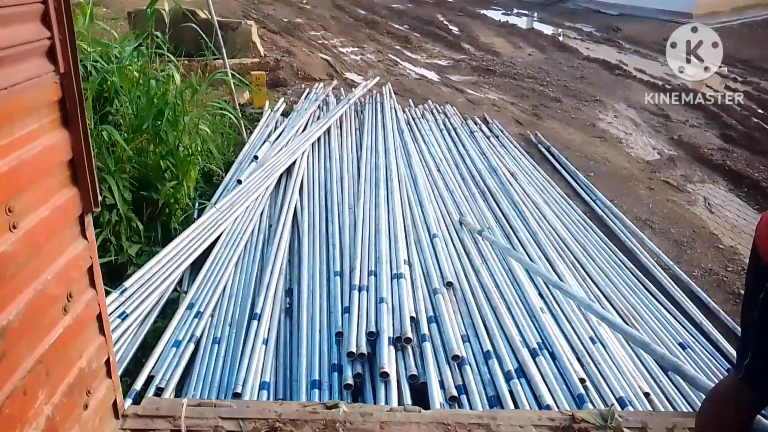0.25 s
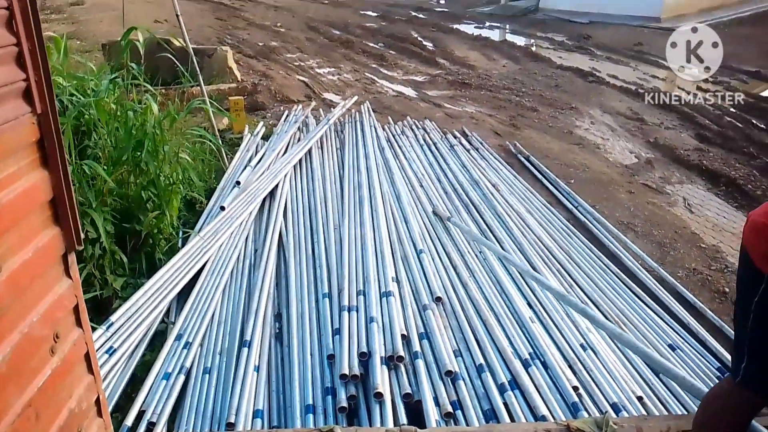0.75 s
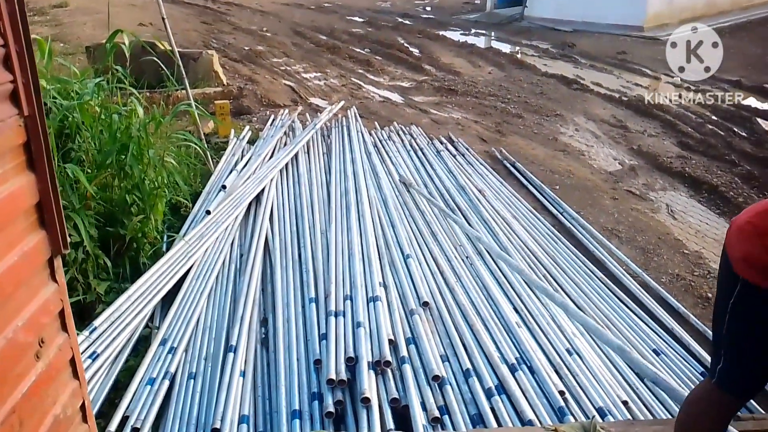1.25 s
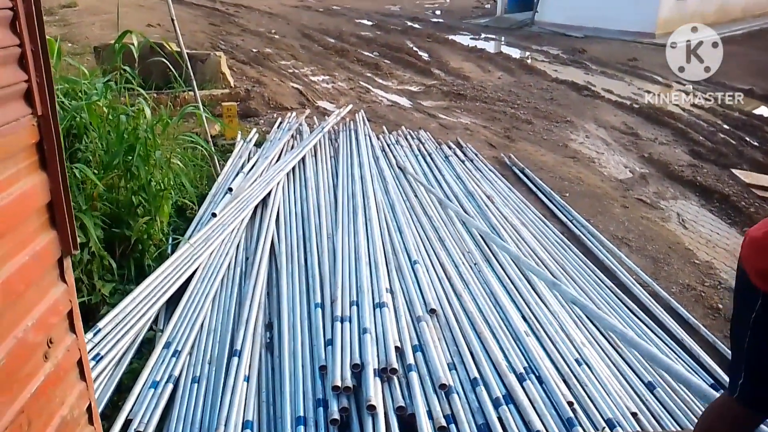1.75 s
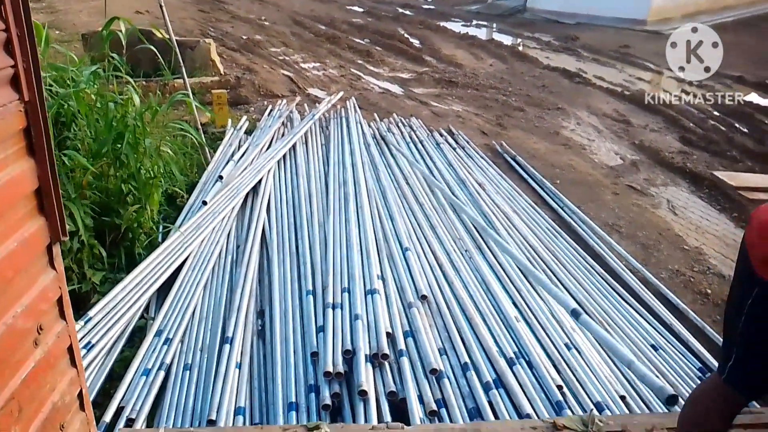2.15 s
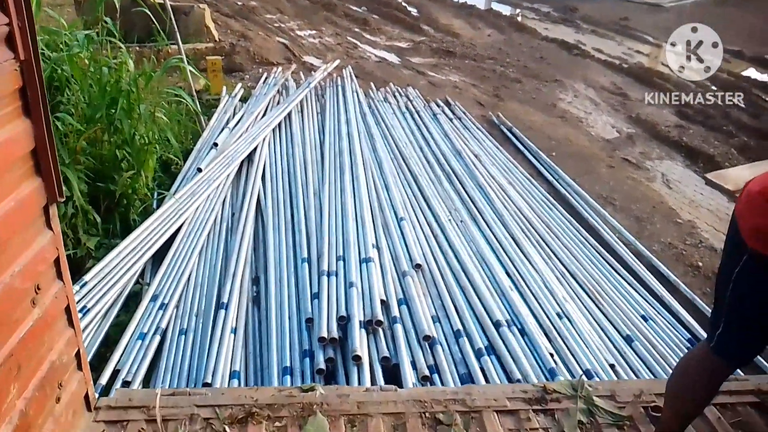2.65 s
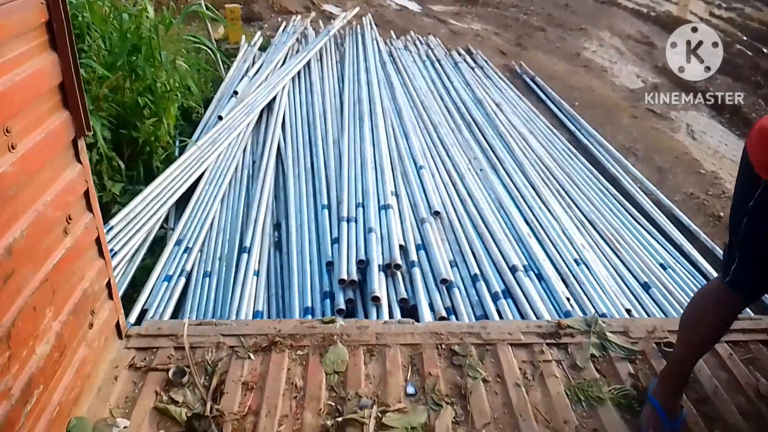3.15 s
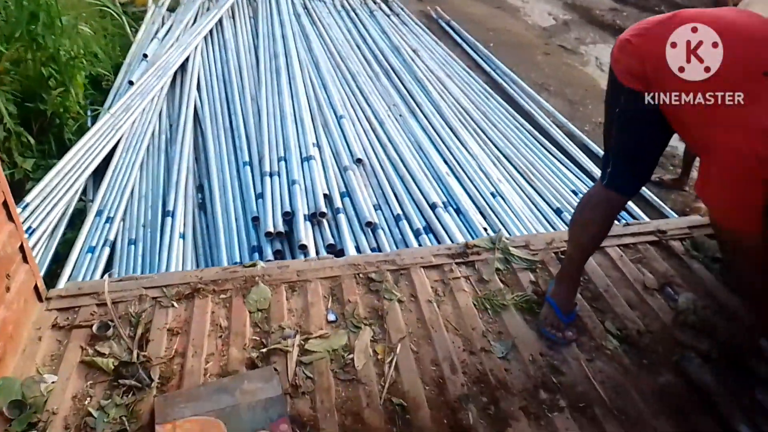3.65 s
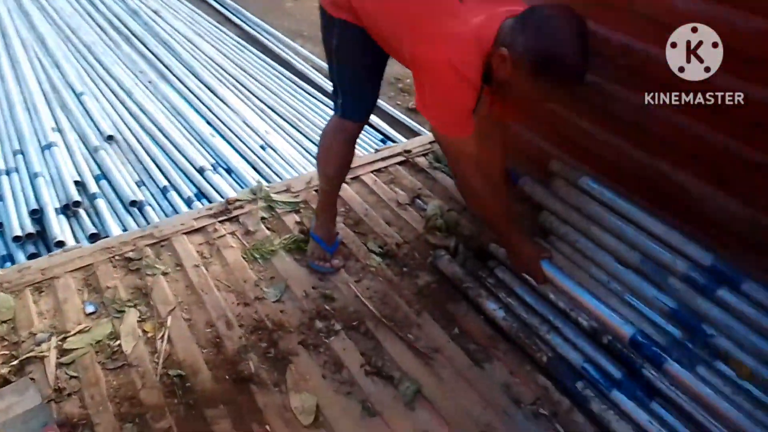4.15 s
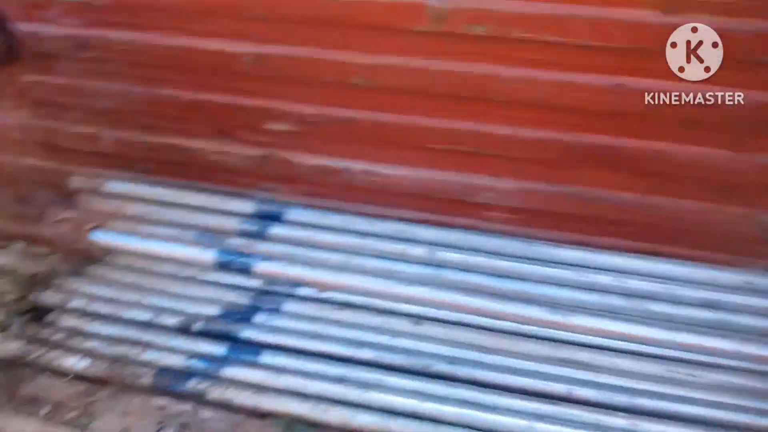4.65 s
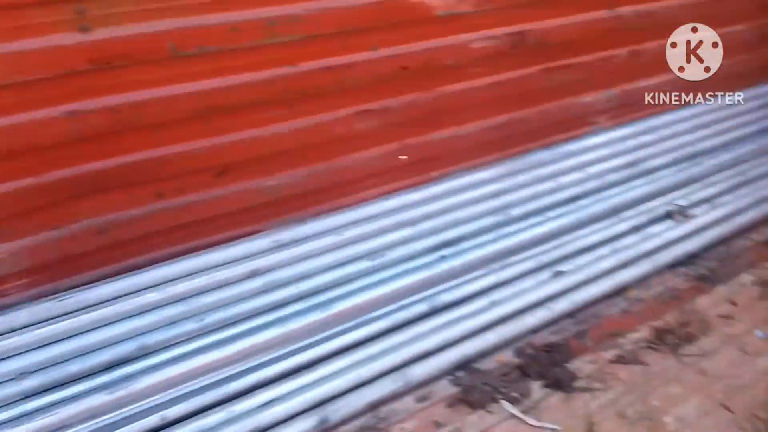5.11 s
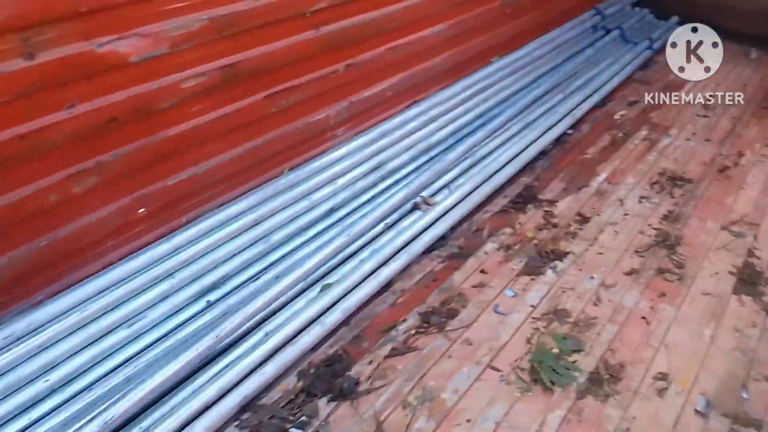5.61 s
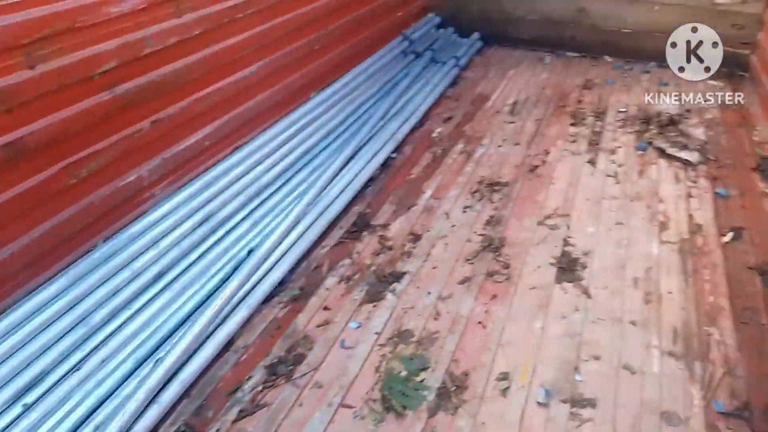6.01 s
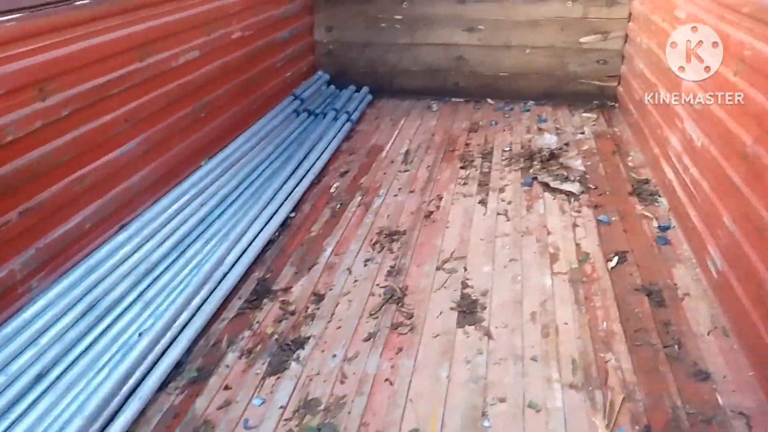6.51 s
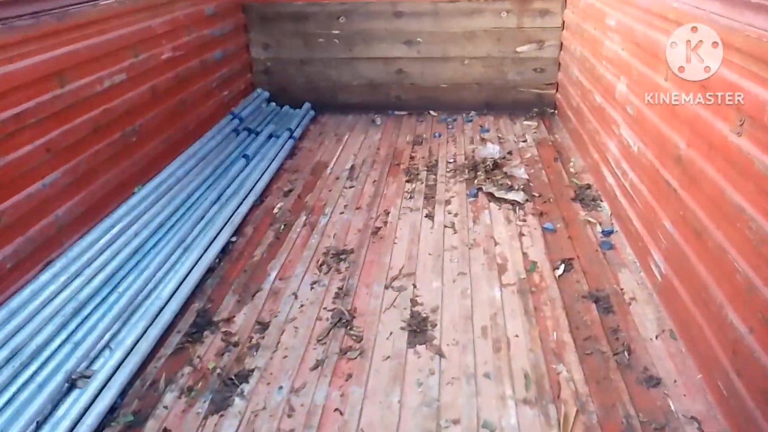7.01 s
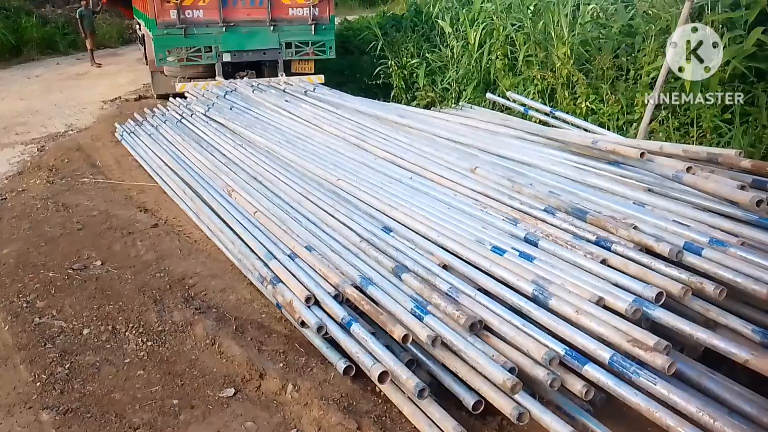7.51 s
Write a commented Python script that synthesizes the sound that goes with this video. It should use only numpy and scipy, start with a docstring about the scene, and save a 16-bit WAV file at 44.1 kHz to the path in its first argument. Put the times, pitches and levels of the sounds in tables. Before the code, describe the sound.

Loud clanging and zinging metal pipes with booming truck-bed rumble, a quieter middle, renewed clanks, then sudden hush and soft insect shimmer.

```python
"""Outdoors beside a truck: long steel pipes are pushed off its bed onto a pile; each one knocks, bounces and slides.
Contacts excite sine banks for the pipes' bending modes and the falling zing of their walls,
and decaying coloured noise for the bright rasp and the boom of the bed. Thuds, dry taps and a chassis rumble join in.
The clatter is cut off abruptly, and a quiet roadside of soft air and insects, both shaped noise, fades in."""
import sys
import numpy as np
from scipy import signal
from scipy.fft import rfft, irfft
from scipy.io import wavfile
from scipy.ndimage import uniform_filter1d, minimum_filter1d

SR = 44100
rng = np.random.default_rng(int(sys.argv[2]) if len(sys.argv) > 2 else 0)


def log_audio(samples):
    """Write samples as a 16-bit WAV file to the path given in sys.argv[1]."""
    # one column per channel
    frames = np.atleast_2d(samples).T
    # limit to full scale, then quantise
    limited = np.clip(frames, -1, 1)
    pcm = np.round(limited * 32767).astype(np.int16)
    wavfile.write(sys.argv[1], SR, pcm)


N = 342643
TIME = np.arange(N) / SR
RING_TIME = TIME[:int(0.7 * SR)]   # time axis of one struck sound
CUT_S, FADE_IN_S = 7.255, (7.35, 7.465)   # end of the clatter; start and end of the roadside's fade


def from_db(db):
    """Decibels to gain."""
    return 10 ** (np.asarray(db) / 20)


def unit(x):
    """Scale to energy 1."""
    return x / np.sqrt(np.sum(x ** 2) + 1e-20)


def add(track, s, sound):
    """Mix a sound in from time s."""
    start = max(round(s * SR), 0)
    track[start:start + len(sound)] += sound[:N - start]


def gain_at(colour, hz):
    """Read a colour on a log-frequency axis."""
    points = np.array(colour)
    return from_db(np.interp(np.log(hz + 1e-3), np.log(points[:, 0]), points[:, 1]))


def noise(colour, size):
    """Coloured noise of rms 1, falling away beyond the ends of its colour."""
    hz = np.linspace(1, SR / 2, size // 2 + 1)
    low_end = np.minimum(hz / colour[0][0], 1) ** 2
    high_end = np.minimum(colour[-1][0] / hz, 1) ** 2
    spectrum = rfft(rng.standard_normal(size)) * gain_at(colour, hz) * low_end * high_end
    return unit(irfft(spectrum, size)) * np.sqrt(size)


def attack(contact_s):
    """Force builds up smoothly while a contact lasts."""
    return np.sin(np.pi / 2 * np.minimum(RING_TIME / contact_s, 1)) ** 2


def dying(colour, t60, contact_s=0.00049):
    """Countless overlapping modes: coloured noise that dies away, energy 1."""
    decay = from_db(-60 * RING_TIME / t60)
    return unit(noise(colour, len(RING_TIME)) * decay * attack(contact_s))


def ring(hz, gain, t60, contact_s=0.0004):
    """A sum of decaying sines, energy 1."""
    t = RING_TIME.astype(np.float32)
    sines = np.sin(np.outer(np.float32(2 * np.pi * hz), t))
    decays = np.exp(np.outer(np.float32(-np.log(1000) / t60), t))
    return unit((np.float32(gain) @ (sines * decays)) * attack(contact_s))


def resonate(x, hz, width_hz):
    """One two-pole resonance with gain 1 on top."""
    r = np.exp(-np.pi * width_hz / SR)
    feedback = [1, -2 * r * np.cos(2 * np.pi * hz / SR), r * r]
    return signal.lfilter(np.array([1, 0, -1]) * (1 - r * r) / 2, feedback, x)


# Colour of the open air. Each row: frequency in Hz, relative density in dB per Hz.
AIR_COLOUR = [(24, -33.5), (40, 0.5), (140, -3.5), (217, -6.5), (363, -9), (968, -19.5), (2120, -17),
              (3220, -22.5), (4110, -18.5), (4880, -25.5), (5940, -36), (9010, -31.5), (14000, -48.5)]


def air():
    """Soft outdoor air is low-heavy noise, with a faint white hiss on top."""
    return from_db(-56.5) * noise(AIR_COLOUR, N) + from_db(-74) * rng.standard_normal(N)


# Bending modes of a long pipe, spreading apart as they climb.
# Each row: nominal frequency in Hz, typical level in relative dB.
PIPE_MODES = [(262, 1), (330, 5.5), (404, 6), (515, 5.5), (640, 0.5), (761, 3.5), (860, 1.5), (1030, 0),
              (1160, -5.5), (1272, -5), (1400, -4.5), (1535, -3.5), (1662, 0.5), (1784, 1.5), (1959, 1.5),
              (2100, -0.5), (2245, -1.5), (2397, -1.5), (2563, -11), (2715, -9.5), (2874, -7), (3050, -5),
              (3232, -12.5)]


def struck_modes(detune=0.0063, spread_db=5.0):
    """Each pipe is tuned a little differently, and each contact point favours other modes: (Hz, signed gain)."""
    hz, level_db = np.transpose(PIPE_MODES)
    signs = rng.choice([-1, 1], len(hz))
    gain = from_db(level_db + spread_db * rng.standard_normal(len(hz))) * signs
    return hz * (1 + detune * rng.standard_normal()), gain


# Colour of the pile ringing along. Each row: frequency in Hz, relative density in dB per Hz.
CLANG_COLOUR = [(120, -26.5), (230, -5.5), (330, 9.5), (480, 6), (650, 0), (1000, -1.5), (1700, -5),
                (2200, -2.5), (2700, -11.5), (3400, -13.5), (5000, -20), (8000, -42.5)]


def clang(t60, pile_t60, pile_db):
    """A pipe rings, its high modes dying first; the pile around rings along."""
    hz, gain = struck_modes()
    pipe = ring(hz, gain, t60 * (1000 / hz) ** 0.25)
    return unit(pipe + from_db(pile_db) * dying(CLANG_COLOUR, pile_t60))


OVAL_HZ = 3590   # lowest cut-on at which a pipe wall flexes into an oval; each ring starts up to 42.3 Hz above


def zing(t60, lowest_db, spacing_hz=0.11, damping_hz=350, count=70):
    """Oval wall waves crowd above their cut-on; the lowest travel slowest and last longest, so the ring settles there."""
    k = np.arange(count) + 1
    above_hz = spacing_hz * k ** 2 * rng.uniform(0.7, 1.1)
    lowest = 1 + from_db(lowest_db) * np.exp(-above_hz / 60)
    # alternating signs carry the wave from the far end; dents and neighbours scatter part of it
    gain = ((-1.) ** k + rng.standard_normal(count)) * np.sqrt(k) * lowest
    hz = OVAL_HZ + rng.uniform(0, 42.3) + above_hz
    return ring(hz, gain, t60 / (1 + above_hz / damping_hz), contact_s=0.003)


# Colour of the rumbling bed panels. Each row: frequency in Hz, relative density in dB per Hz.
BOOM_COLOUR = [(50, -23.5), (85, -16.5), (110, -7), (135, -2), (160, -3), (210, -0.5), (300, -5),
               (400, -9.5), (520, -14), (800, -20.5), (2000, -60.5)]
# Hollow modes of the truck bed. Each row: nominal frequency in Hz, relative level in dB, t60 in seconds.
BED_MODES = [(136.2, -3, 0.74), (162.4, 1, 0.59), (182, 0, 0.52), (216.2, -2.5, 0.56), (287.3, -4, 0.25),
             (403, -4, 0.1)]


def boom(t60, modes_db):
    """The bed's panels rumble, with a few hollow modes among them."""
    hz, level_db, mode_t60 = np.transpose(BED_MODES)
    tuned_hz = hz * rng.normal(1, 0.018, len(hz))
    hollow = ring(tuned_hz, from_db(level_db) * rng.choice([-1, 1], len(hz)), mode_t60)
    return unit(dying(BOOM_COLOUR, t60, contact_s=0.0094) + from_db(modes_db) * hollow)


def contacts(per_s, spread_db):
    """Random small collisions of uneven strength, rms 1."""
    sizes = from_db(spread_db * np.clip(rng.standard_normal(N), -2, 2)) * rng.choice([-1, 1], N)
    return unit(sizes * (rng.random(N) < per_s / SR)) * np.sqrt(N)


def shaken(bodies, per_s, spread_db, even_s=0.2):
    """Several bodies, each under its own hail of contacts; their summed vibration is held near rms 1."""
    x = sum(signal.oaconvolve(contacts(per_s, spread_db), body)[:N] for body in bodies)
    power = np.abs(uniform_filter1d(x ** 2, int(even_s * SR) + 1))
    return x / np.sqrt(power + 1e-6)


def contact_tone(x, tone_hz, emphasis=1.15, octaves=0.99):
    """The stiffness of the contact favours a region that moves as the pipe slides."""
    favoured = 0
    for hz in np.geomspace(600, 2400, 5):
        nearness = np.exp(-(np.log2(tone_hz / hz) / octaves) ** 2)
        favoured = favoured + resonate(x, hz, hz / 2) * nearness
    return unit(x + emphasis * favoured) * np.sqrt(N)


SWELL_S, BED_SWELL_S = 0.0085, 0.054   # the steel answers at once, the heavy bed later
BED_LINGERS = 2   # the bed takes this many times longer to settle than the steel
# Spells of rattling and sliding. Each row: nominal start in seconds, hold in seconds, settling of the steel
# in dB per second, then relative clang, boom, rasp and zing levels in dB, contact tone in Hz.
SPELLS = [(0.0, 0.1, 78, -15, -11, -29.5, -23, 1400), (0.304, 0.14, 58.5, -19, -13.5, -38.5, -36, 1086),
          (0.554, 0.33, 60.5, -60, -39.5, -42.5, -47, 1000), (0.87, 0.15, 57, -58, -38.5, -39.5, -46, 1145),
          (1.03, 0.23, 48, -13.5, -14.5, -25, -24, 1100), (1.493, 0.16, 99.5, -18.5, -16.5, -38, -49, 964),
          (1.74, 0.25, 59, -52, -43, -46, -69, 800), (2.103, 0.11, 151, -13, -10, -29, -45, 950),
          (2.26, 0.058, 72, -19, -17.5, -29.5, -34, 1050), (2.47, 0.03, 83.5, -22.5, -27, -35, -40, 1050),
          (2.573, .27, 136.5, -16, -29.5, -23.5, -27, 1550),
          (3.068, 0.16, 96.5, -39.5, -31, -49, -52, 1070),
          (3.207, 0.027, 108.5, -27.5, -16.5, -36.5, -33.5, 1153),
          (3.56, 0.096, 33.5, -40.5, -28, -51, -59, 1117), (4.133, .44, 131, -48.5, -45, -57.5, -64, 1100),
          (4.542, 0.059, 168.5, -43, -27, -47, -44.5, 850), (4.925, .03, 152, -66, -48, -53.5, -65, 1490),
          (4.959, 0.045, 70, -30, -25, -44.5, -38, 1250), (5.286, 0.53, 120, -45, -36.5, -53.5, -51, 1403),
          (5.847, 0.12, 151, -49.5, -31, -52, -70, 806), (5.914, .16, 85.5, -11.5, -12, -31, -30, 1220),
          (6.15, 0.074, 64.5, -22.5, -15.5, -40.5, -36, 1000),
          (6.407, 0.19, 93, -37.5, -28, -43, -44, 1500), (6.568, 0.39, 87.5, -17, -16, -41, -47, 1300),
          (7.005, .17, 149.5, -16.5, -34, -30.5, -30.5, 850)]


def spell_curves():
    """Each spell swells, holds and settles at its own rate; overlapping spells add in power and blend their tones."""
    t = TIME[::40]
    start, hold, settling, clang_db, boom_db, rasp_db, zing_db, tone_hz = np.transpose(SPELLS)[:, :, None]
    # a blow within 20 ms sets the spell off
    blow_s = np.array(BLOWS)[:, 0]
    sets_off = np.abs(blow_s - start) < 0.02
    start = np.where(sets_off.any(axis=1), blow_s[sets_off.argmax(axis=1)], start[:, 0])[:, None]
    fall_db = settling * np.maximum(t - start - hold, 0)
    steel = np.clip((t - start) / SWELL_S, 0, 1) * from_db(-fall_db)
    bed = np.clip((t - start) / BED_SWELL_S, 0, 1) * from_db(-fall_db / BED_LINGERS)
    layers = [(clang_db, steel), (boom_db, bed), (rasp_db, steel), (zing_db, steel)]
    powers = [(from_db(db) * shape) ** 2 + 1e-18 for db, shape in layers]
    # the louder clang pulls the blended tone towards its own
    tone = np.sum(powers[0] * tone_hz, axis=0) / np.sum(powers[0], axis=0)
    levels_db = [10 * np.log10(np.sum(power, axis=0)) for power in powers]
    return [np.interp(TIME, t, curve) for curve in levels_db + [tone]]


# Colour of steel scraping steel. Each row: frequency in Hz, relative density in dB per Hz.
RASP_COLOUR = [(1200, 4), (2500, 0), (3300, -2.5), (4400, 2), (5500, -3.5), (7000, -5), (8500, -15),
               (9600, -24), (10200, -18), (11200, -27.5), (13000, -34.5), (15000, -27.5)]


def rattle(count=4):
    """Pipes chatter and slide on each other and on the bed: hails of small contacts follow the spells."""
    clang_db, boom_db, rasp_db, zing_db, tone_hz = spell_curves()
    pipe_bodies = [clang(t60=0.34, pile_t60=0.32, pile_db=2.5) for _ in range(2 * count)]
    pipes = shaken(pipe_bodies, per_s=11, spread_db=2.5)
    walls = shaken([zing(t60=1.0, lowest_db=3.5) for _ in range(count)], per_s=11, spread_db=2.5)
    bed = shaken([boom(t60=0.26, modes_db=-0.5) for _ in range(count)], per_s=30, spread_db=2)
    grit = shaken([dying(RASP_COLOUR, t60=0.17) for _ in range(count)], per_s=70, spread_db=1.0)
    return (from_db(clang_db - 3.0) * contact_tone(pipes, tone_hz)
            + from_db(zing_db - 2.5) * walls
            + from_db(boom_db - 5) * bed
            + from_db(rasp_db + 1) * grit)


def clank(tone_hz, t60=0.11, octaves=0.3, pile_db=-3, below=1.24, above=1.26):
    """A hard contact picks out the few modes near its tone, then damps them; the pile answers in the same range."""
    hz, gain = struck_modes()
    nearness = np.exp(-(np.log2(hz / tone_hz) / octaves) ** 2)
    own = ring(hz, gain * nearness, np.full(len(hz), t60))
    band = signal.butter(2, [tone_hz / below, tone_hz * above], "band", fs=SR, output="sos")
    pile = unit(signal.sosfilt(band, dying(CLANG_COLOUR, t60=0.34)))
    return unit(own + from_db(pile_db) * pile)


BLOW_RASP_DB, BLOW_ZING_DB, BLOW_CRACK_DB = 8, 5, 15   # relative to a blow's level; a choke weakens zing and crack
# Square blows of pipe on pipe. Each row: start in seconds, relative level in dB,
# choke from 0 (rings freely) to 1 (dead clank), relative boom of the bed in dB, clank tone in Hz.
BLOWS = [(0.003, -5, 0.06, -20, 1000), (0.094, -16, 0.17, -8, 1900), (0.323, -3.5, 0.51, 0, 1260),
         (0.745, -15, 0.35, -16, 1050), (1.033, -10, 0.17, -13, 1020), (1.18, -3.5, .05, -19.5, 1300),
         (1.48, -11.5, 0.21, -22.5, 1030), (1.537, -14, 0.064, -35, 1280), (1.637, -15, .05, -24, 1600),
         (2.103, -4.5, 0.1, -3.5, 1180), (2.163, -6.5, .05, -7, 910), (2.284, -8, 0.08, -14, 1070),
         (2.465, -20.5, 0.3, -23.5, 1150), (2.587, -10.5, 0.95, -25, 1620), (2.757, -9, 1, -22.5, 1380),
         (2.806, -4.5, 1, -18.5, 1570), (3.215, -18, 0.86, -11, 1350), (3.25, -27, .5, -27, 1140),
         (3.583, -29, 0.68, -32.5, 910), (3.641, -30, 0.61, -31, 1510), (3.776, -32, 0.51, -37, 1340),
         (4.035, -31.5, 0.44, -38, 1100), (4.575, -39, .9, -21, 805), (4.961, -18, 0.82, -21, 1330),
         (5.09, -31, .2, -37, 1030), (5.924, -4.5, 0.89, -14.5, 1290), (5.945, -9.5, 0.85, -17, 1160),
         (6.025, -18, 0.82, -21, 1180), (6.154, -20, 0.11, -0.5, 1250), (6.17, -17, 0.86, -11, 960),
         (6.229, -21, 0.88, -3.5, 1030), (6.58, -10, 0.75, -18, 1175), (6.674, -9.5, 0.85, -22.5, 1690),
         (6.742, -15, 0.98, -8, 1020), (6.784, -12, 0.71, -7.5, 1320), (6.839, -7, 1, -11, 1500),
         (6.87, -11, 1, -19.5, 950), (6.945, -12.5, 0.89, -23, 1680), (7.011, -7.5, 0.41, -14, 1300),
         (7.108, -8.5, 1, -20, 950), (7.165, -12, 1, -26, 860)]


def blows():
    """A pipe lands: left free it cracks, rings and zings; choked by its neighbours it mostly clanks."""
    out = np.zeros(N)
    for s, level_db, choke, boom_db, tone_hz in BLOWS:
        free = 1 - choke
        crack = dying(CLANG_COLOUR, t60=0.041)   # the first crack of steel on steel
        steel = (from_db(25.0) * np.sqrt(choke) * clank(tone_hz)
                 + from_db(26.5) * np.sqrt(free) * clang(t60=0.58, pile_t60=0.25, pile_db=3.0)
                 + from_db(BLOW_RASP_DB) * dying(RASP_COLOUR, t60=0.29, contact_s=0.0018)
                 + from_db(BLOW_ZING_DB) * free * zing(t60=0.62, lowest_db=10.5)
                 + from_db(BLOW_CRACK_DB) * free * crack)
        bed = boom(t60=0.32, modes_db=-12.5)
        add(out, s, from_db(level_db) * steel + from_db(boom_db + 19) * bed)
    return out


# Glancing contacts, where a pipe skids a short way along another.
# Each row: start in seconds, relative level in dB, clank tone in Hz.
SKIDS = [(0.003, -16, 1000), (0.094, -21, 1950), (0.745, -33, 1050), (1.18, -14, 1300), (2.281, -36, 1070),
         (2.586, -17, 1620), (3.181, -34, 1030), (4.017, -37.5, 1070), (4.057, -36.5, 1070),
         (4.372, -49.5, 1950), (4.508, -44.5, 2100), (4.561, -45.5, 900), (5.296, -39.5, 2050),
         (5.5, -36, 1900), (5.535, -37.5, 1495), (5.664, -36.5, 2250), (6.086, -38, 1200),
         (6.425, -42, 1650), (6.466, -30, 1950), (6.58, -17.5, 1200), (6.653, -24, 1700),
         (6.784, -29, 1320), (6.84, -29, 1540), (6.95, -25, 1700), (7.009, -28.5, 1350)]


def skids(grip_s=0.0074):
    """A glancing contact takes a moment to grip, then rasps and sets the wall zinging, with a clank in a few modes."""
    out = np.zeros(N)
    for s, level_db, tone_hz in SKIDS:
        steel = (from_db(30.5) * dying(RASP_COLOUR, t60=0.21)
                 + from_db(25) * zing(t60=0.62, lowest_db=-4.5)
                 + from_db(27) * clank(tone_hz, t60=0.2, pile_db=-8.5))
        add(out, s, from_db(level_db) * steel * attack(grip_s))
    return out


# The chassis: relative level, inertia, share of the low clatter's swing in dB.
SHUDDER_DB, SHUDDER_LAG_S, SHUDDER_FOLLOWS = -18.5, 0.17, 0.77
LURCH_S, LURCH_LENGTH_S, LURCH_DB = 0.5, 0.17, -27   # one heavier heave early on: peak time, decay each side, level
# Colour of the truck's body shuddering on its springs. Each row: frequency in Hz, relative density in dB per Hz.
BODY_COLOUR = [(25, -14), (40, -10), (55, 0), (69, -8.5), (86, 1.5), (110, -8.5), (160, -19.5)]


def shudder(load, below_hz=500):
    """The deep rumble of the chassis is fed by the low part of the clatter, lags it and outlasts it; once it heaves."""
    low_part = signal.sosfilt(signal.butter(2, below_hz, fs=SR, output="sos"), load)
    keep = np.exp(-1 / (SHUDDER_LAG_S * SR))
    stored = signal.lfilter([1 - keep], [1, -keep], low_part ** 2)
    fed = from_db(SHUDDER_DB + SHUDDER_FOLLOWS * 10 * np.log10(stored + 1e-12))
    lurch = from_db(LURCH_DB) * np.exp(-np.abs(TIME - LURCH_S) / LURCH_LENGTH_S)
    return (fed + lurch) * noise(BODY_COLOUR, N)


# Dull thuds of weight on the bed. Each row: start in seconds, relative level in dB, pitch in Hz.
THUDS = [(3.23, -15.5, 186.5), (3.598, -16.5, 177.3), (3.715, -18.5, 163.7), (4.562, -16, 203.7),
         (4.597, -21, 186.7), (4.977, -3.5, 170.5), (5.001, -7, 164.1), (5.305, -17.5, 176),
         (6.239, -9, 261.5)]


def thuds(t60=0.48, overtone=1.65, overtone_db=-12):
    """A floor panel drums at its lowest two modes."""
    out = np.zeros(N)
    for s, level_db, hz in THUDS:
        modes_hz = hz * np.array([1, overtone])
        panel = ring(modes_hz, from_db([0, overtone_db]), np.full(2, t60), contact_s=0.0028)
        add(out, s, from_db(level_db + 20) * panel)
    return out


# Light, dry taps. Each row: start in seconds, relative level in dB, tone in Hz.
TAPS = [(3.7729, -33, 1980), (3.9679, -41.5, 1990), (4.158, -47, 3540), (4.875, -52.5, 2130),
        (5.261, -34.5, 2150), (5.6256, -40.5, 3730), (5.744, -32, 2940), (6.6533, -9.5, 2120),
        (6.6754, -15, 1970), (6.9456, -22.5, 2390)]


def taps():
    """Well-damped touches: a dry click, then a brief ring close to one tone inside a short scuff."""
    out = np.zeros(N)
    for s, level_db, tone_hz in TAPS:
        scuff = unit(resonate(dying(RASP_COLOUR, t60=0.084), tone_hz, 900))
        ping = ring(tone_hz * rng.uniform(0.94, 1.0, 3), rng.choice([-1, 1], 3), np.full(3, 0.07))
        click = dying(RASP_COLOUR, t60=0.014)
        tap = from_db(23.5) * scuff + from_db(5) * ping + from_db(11.0) * click
        add(out, s, from_db(level_db) * tap)
    return out


TURN_S = (4.2, 5.7)   # the listening point swings from the pile into the truck's steel box


def steel_box(x, hollow_db=-4, hollow_hz=340, dip=0.51, dip_hz=2950):
    """Facing into the box, reflections between its walls swell the low middle and thin the upper middle."""
    facing = np.interp(TIME, TURN_S, [0, 1])
    hollow = from_db(hollow_db) * resonate(x, hollow_hz, 51)
    return x + facing * (hollow - dip * resonate(x, dip_hz, 1600))


# Colour of the insects. Each row: frequency in Hz, relative density in dB per Hz.
INSECT_COLOUR = [(3000, -47.5), (3600, -21), (4000, -1), (4300, -3), (4800, -20), (5600, -16), (5900, -6),
                 (6200, -16), (7800, -14), (8800, -42)]


def roadside():
    """Quiet air under a steady insect shimmer: noise gathered in narrow high bands."""
    return from_db(-64) * noise(AIR_COLOUR, N) + from_db(-69.5) * noise(INSECT_COLOUR, N)


def scene():
    """The unloading over air and a faint hiss, then the quiet roadside."""
    background = air()
    clatter = steel_box(rattle() + blows() + skids())
    unloading = clatter + shudder(clatter) + thuds() + taps()
    return np.where(TIME < CUT_S, unloading + background, roadside())[None]


def record(dry, ceiling_db=-3.5, release_db_per_s=200, offset=-0.016):
    """A fast limiter holds the crashes down; the signal sits just off zero, stops dead and fades back in; the top is cut."""
    over_db = np.maximum(20 * np.log10(np.abs(dry[0]) + 1e-9) - ceiling_db, 0)
    # gain reduction jumps up at once and recovers along a straight line in dB
    release_db = release_db_per_s * TIME
    held_db = np.maximum.accumulate(over_db + release_db) - release_db
    # the cut reaches a little ahead of each peak, then its corners are rounded
    early_db = minimum_filter1d(-held_db, size=45)
    smooth_db = uniform_filter1d(uniform_filter1d(early_db, size=23), size=23)
    fader = np.clip((CUT_S - TIME) / 0.00054, 0, 1) + np.interp(TIME, FADE_IN_S, [0, 1])
    top_cut = signal.ellip(11, 0.1, 80, 15700, fs=SR, output="sos")
    return signal.sosfilt(top_cut, (dry * from_db(smooth_db) + offset) * fader)


dry = scene()
out = record(dry)
log_audio(out)
```